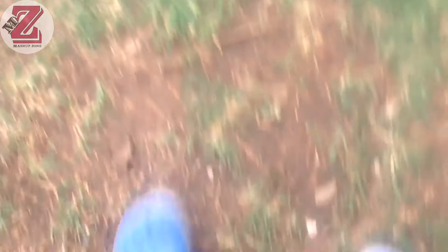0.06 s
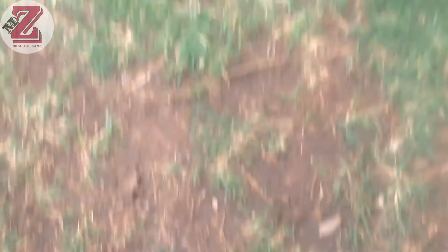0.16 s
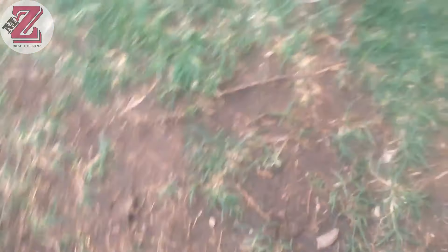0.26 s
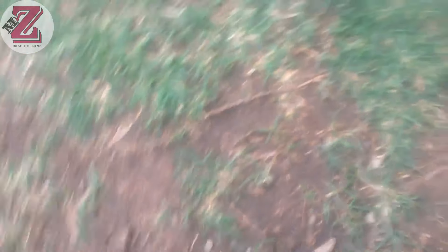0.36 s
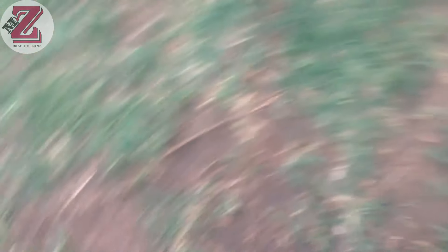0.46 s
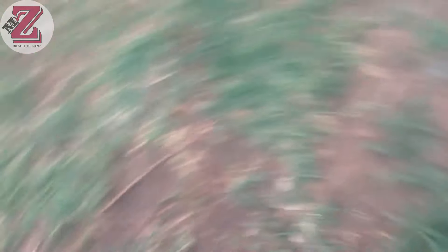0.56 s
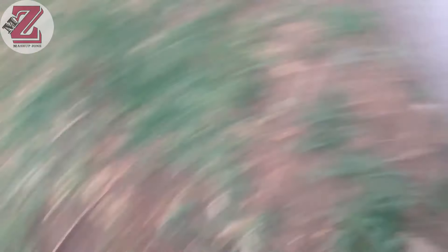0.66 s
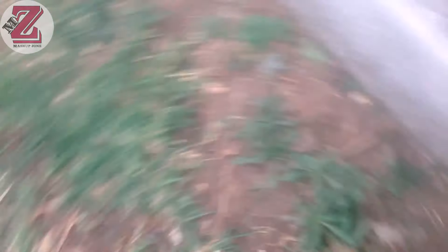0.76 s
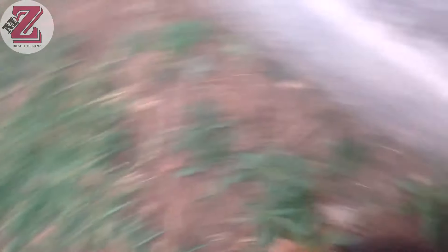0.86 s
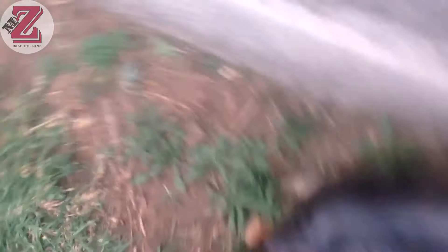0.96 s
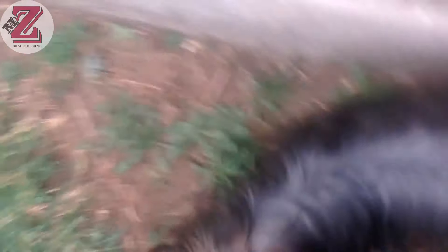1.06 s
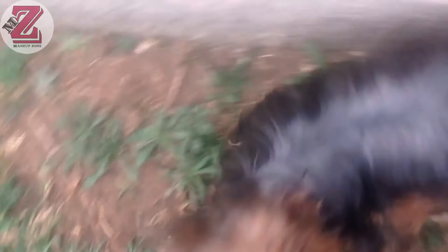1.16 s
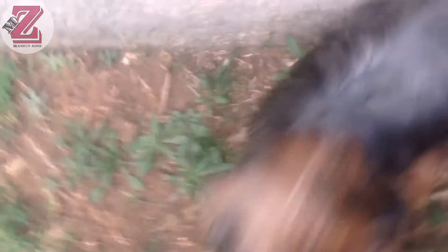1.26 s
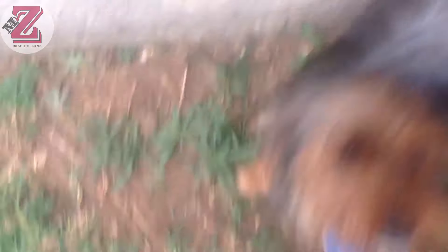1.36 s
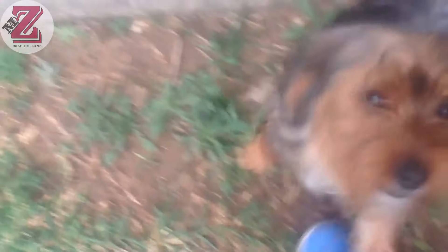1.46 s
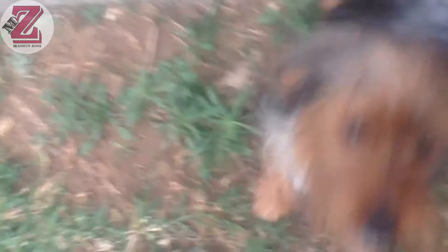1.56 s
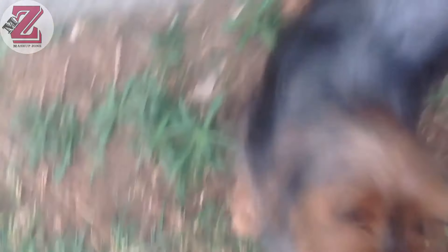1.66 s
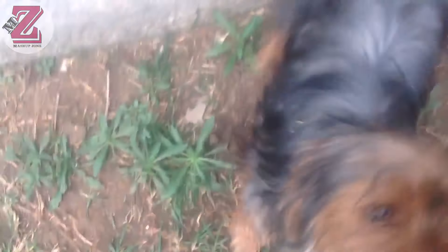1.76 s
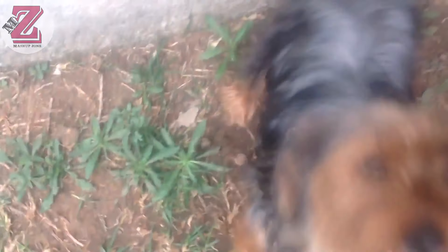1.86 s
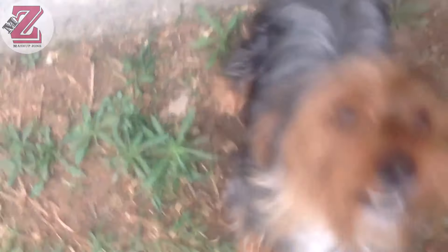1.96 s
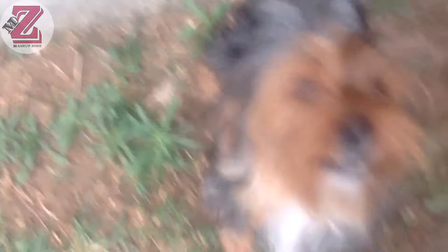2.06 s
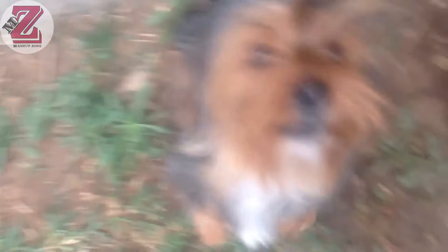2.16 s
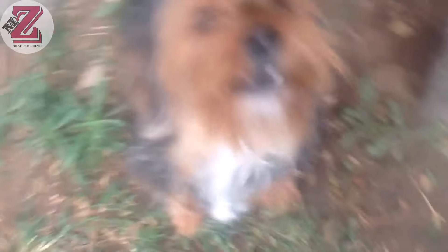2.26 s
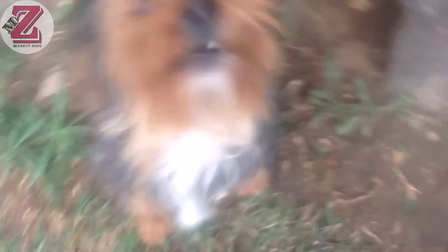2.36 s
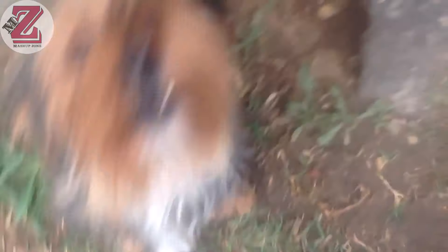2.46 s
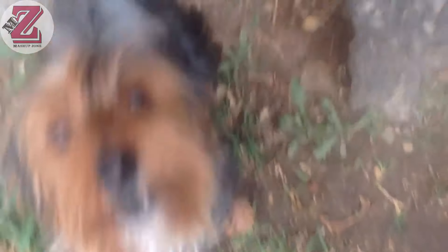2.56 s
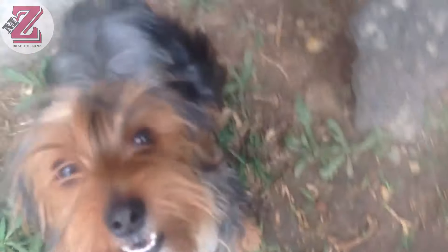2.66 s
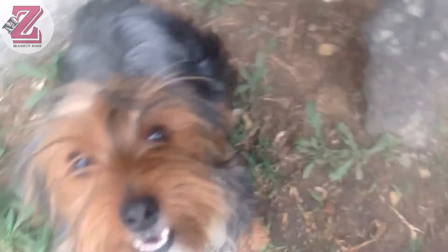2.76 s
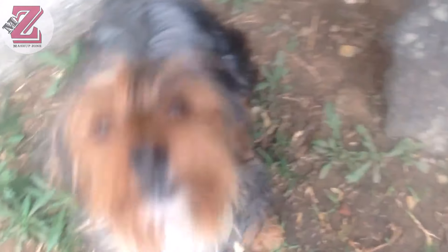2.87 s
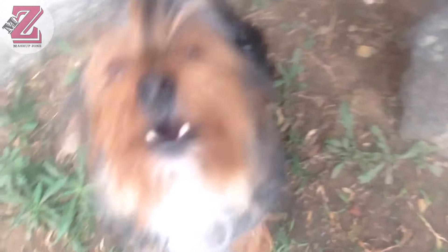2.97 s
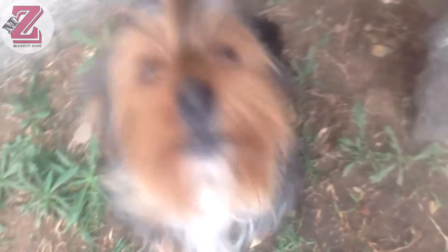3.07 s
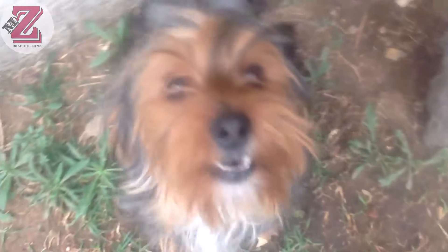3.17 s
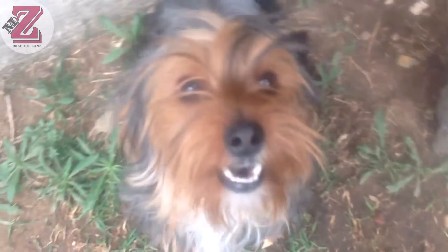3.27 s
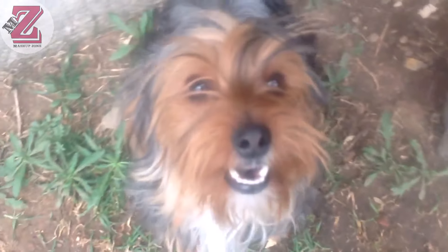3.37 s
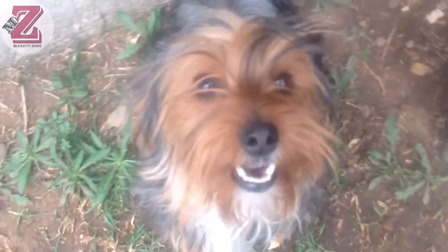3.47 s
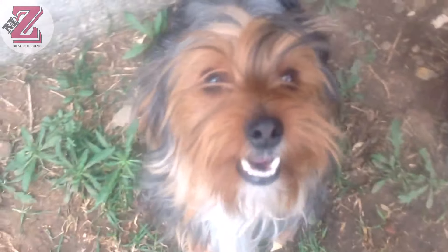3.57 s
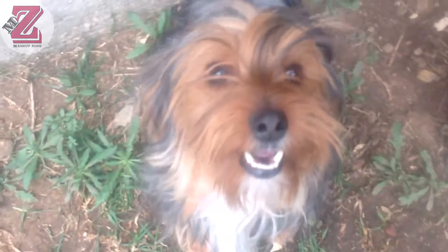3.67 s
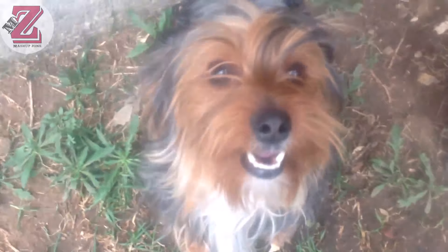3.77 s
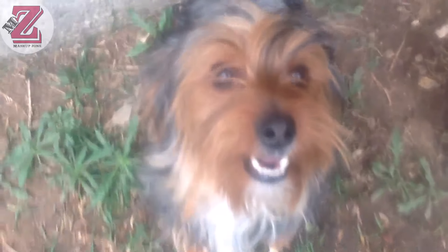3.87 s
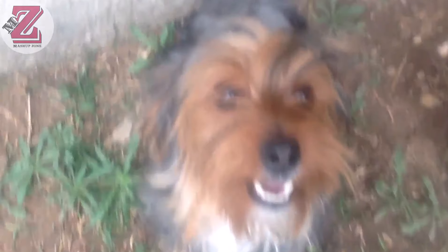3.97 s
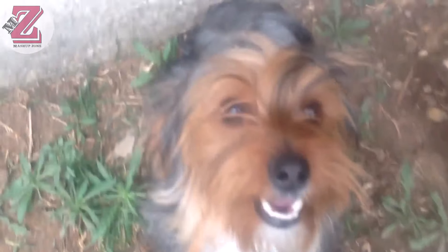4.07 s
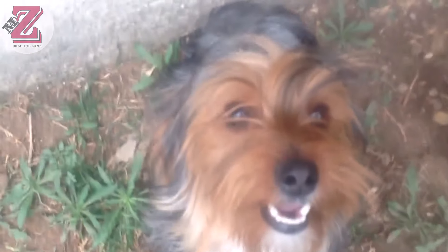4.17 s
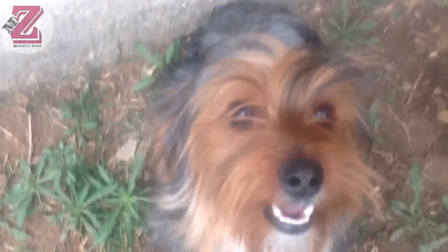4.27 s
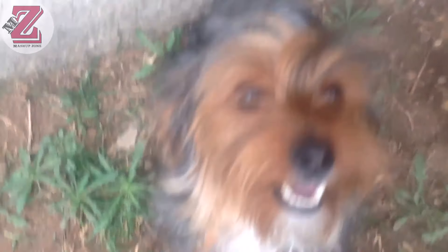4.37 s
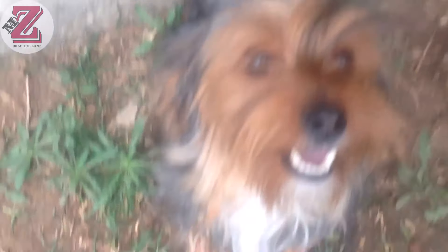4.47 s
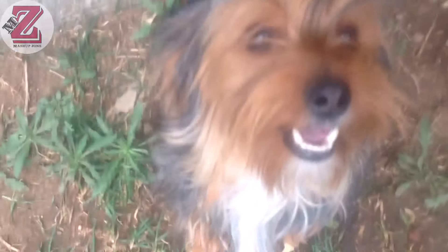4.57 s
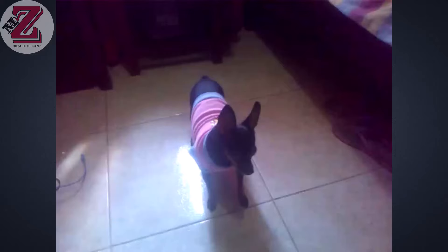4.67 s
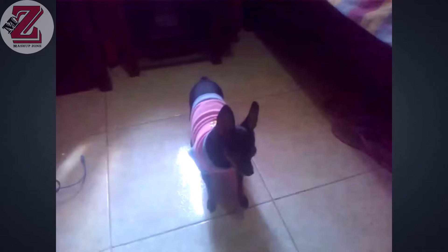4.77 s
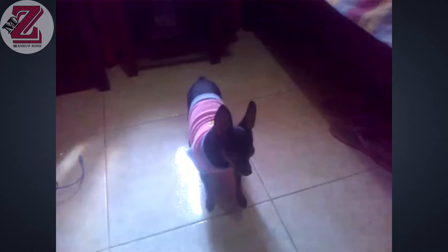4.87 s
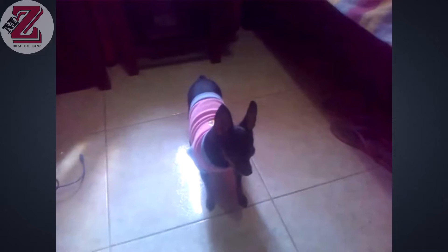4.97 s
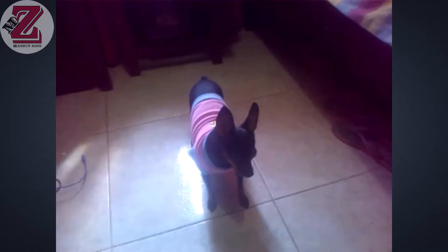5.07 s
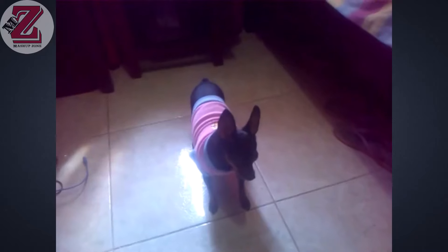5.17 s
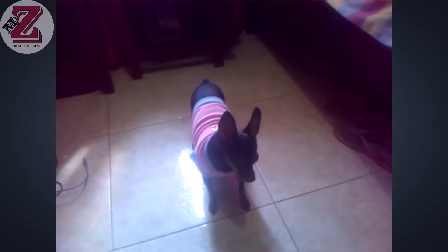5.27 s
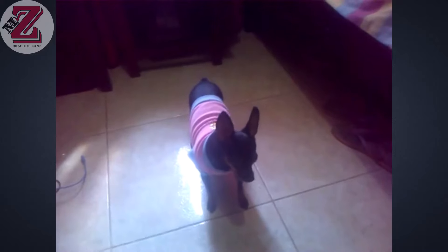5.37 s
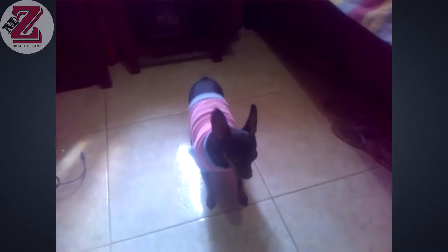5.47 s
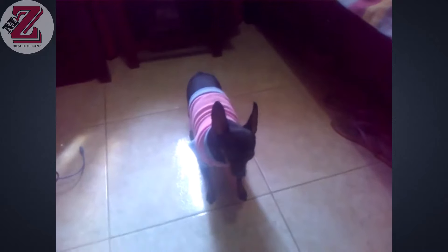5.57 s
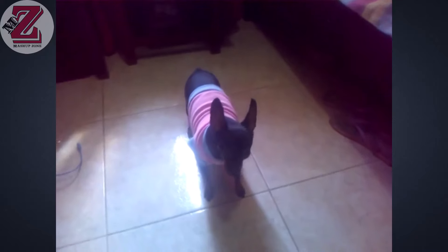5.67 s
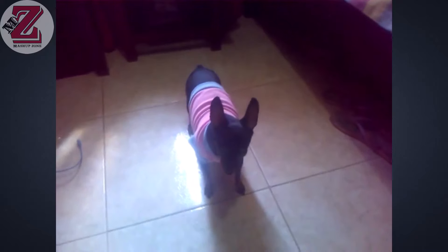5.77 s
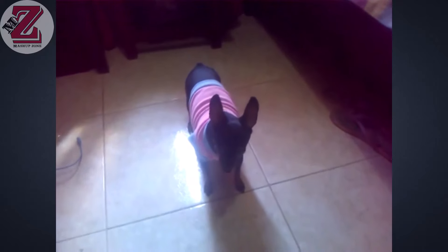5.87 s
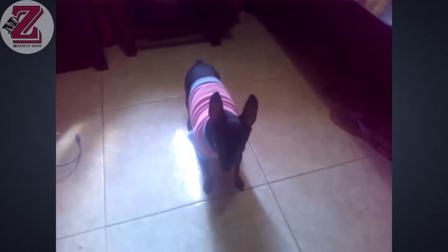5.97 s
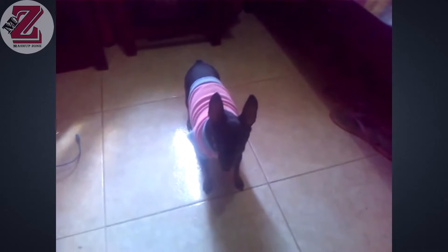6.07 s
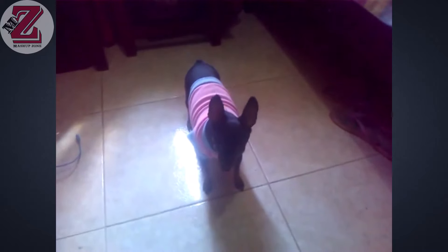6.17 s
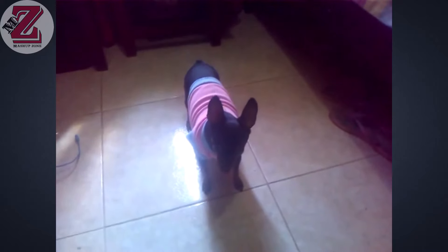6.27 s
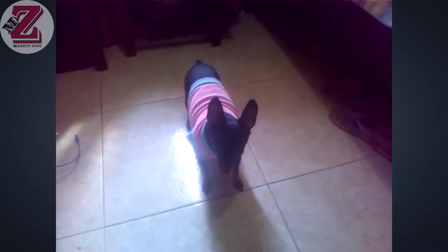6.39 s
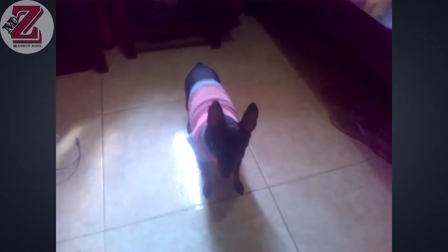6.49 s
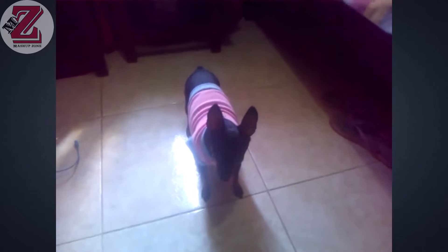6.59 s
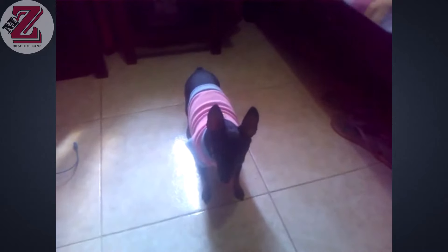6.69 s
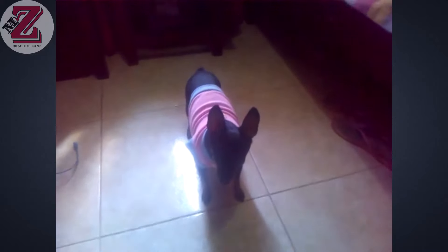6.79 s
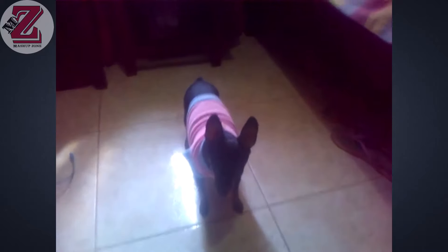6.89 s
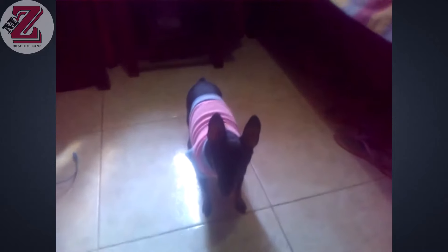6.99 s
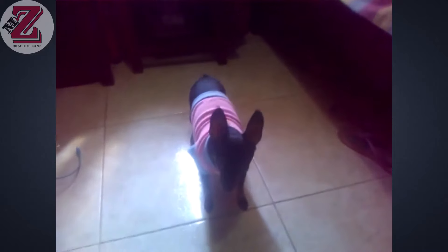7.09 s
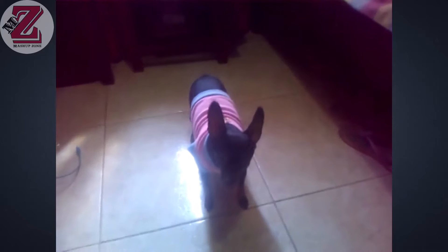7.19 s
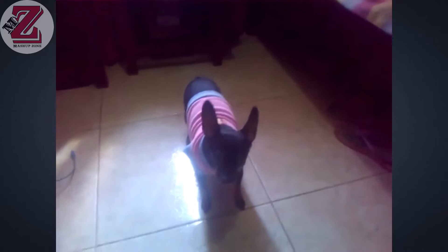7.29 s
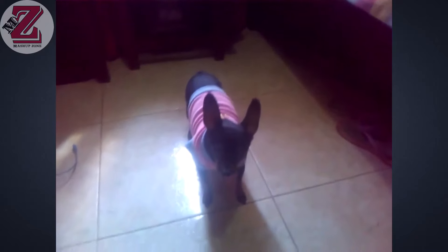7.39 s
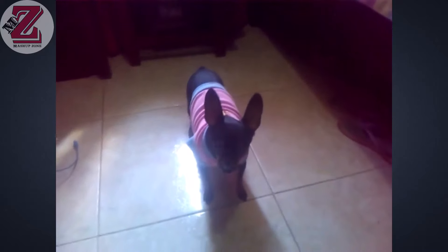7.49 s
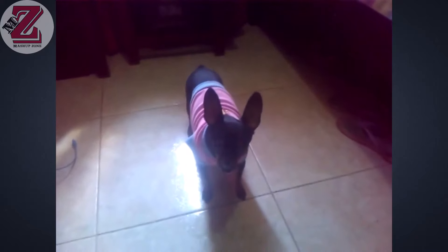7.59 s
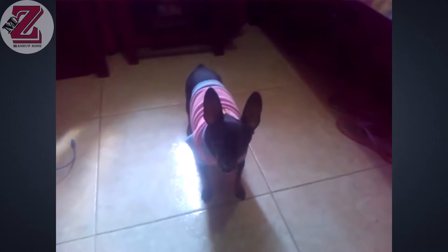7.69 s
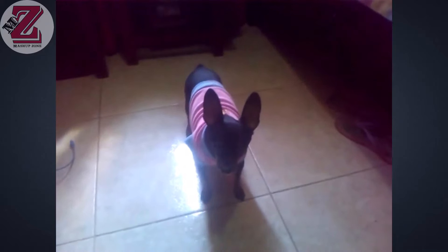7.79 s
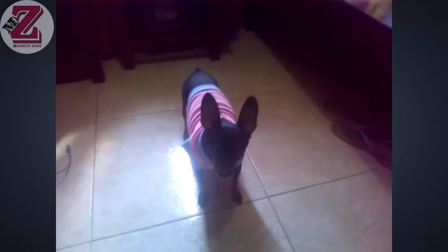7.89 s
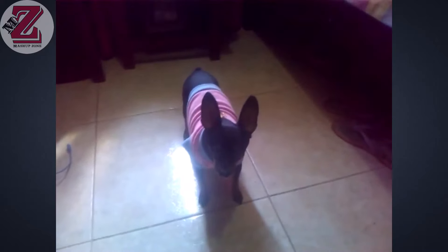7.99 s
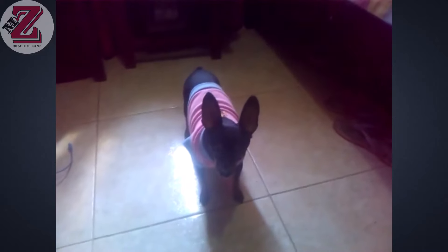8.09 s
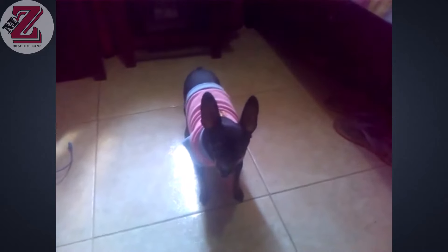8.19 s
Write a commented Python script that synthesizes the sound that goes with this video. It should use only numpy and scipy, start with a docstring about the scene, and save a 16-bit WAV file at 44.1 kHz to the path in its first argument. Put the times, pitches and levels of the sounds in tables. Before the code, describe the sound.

Close handheld microphone outdoors: shuffling steps, grass rustle, thuds and dry snaps, then two rough barks about half a second apart, each ending in a clean falling note, pushing the level to its limit. Light sniffing follows. After an abrupt cut and tiny gap, steady indoor hiss carries two very short high yaps well apart, with faint claw clicks between; the first yap distorts.

```python
"""First a yard: feet swish and scuff over dry grass, footfalls thud and stalks snap as filtered noise.
A terrier barks twice: pulses, rough then clear, ring a moving throat, echo off walls and drive the limiter.
It sniffs and huffs, two swells of noise. After a cut and a moment of silence, a hissy tiled room:
a tiny dog yaps, claws tick twice as clicks of noise, and it yaps again; loud yaps clip the microphone."""
import sys
import numpy as np
from scipy import signal
from scipy.fft import rfft, irfft, next_fast_len
from scipy.io import wavfile
from scipy.ndimage import uniform_filter1d, minimum_filter1d

SR = 44100
rng = np.random.default_rng(int(sys.argv[2]) if len(sys.argv) > 2 else 0)


def digitize_waveform(pressure):
    """Quantize a signal to 16-bit integers and store it at the path in sys.argv[1].

    Rows of a 2-D input are taken as channels; values are limited to [-1, 1].
    """
    field = np.atleast_2d(pressure).T
    bounded = np.clip(field, -1, 1)
    quanta = np.round(bounded * 32767).astype(np.int16)
    wavfile.write(sys.argv[1], SR, quanta)


N = 363384
TIME = np.arange(N) / SR
YARD_ENDS_S, ROOM_STARTS_S = 4.692, 4.755
EDGE_HZ, ROOM_EDGE_HZ = 16000, 5500  # band limits: the final sound, and the room


def gain_of(db):
    """Decibels to amplitude."""
    return 10 ** (np.asarray(db) / 20)


def evened(x):
    """Scales to rms 1."""
    return x / np.sqrt(np.mean(x ** 2) + 1e-20)


def read(points, hz):
    """Reads a table on a log-frequency axis."""
    f, value = np.transpose(points)
    return np.interp(np.log(hz + 1), np.log(f + 1), value)


def add(mix, s, sound):
    """Mixes a sound in at time s."""
    part = mix[round(s * SR):][:len(sound)]
    part += sound[:len(part)]


def blend(a, b, share):
    """From a to b as the share goes from 0 to 1."""
    return a + (b - a) * share


def ramp(t, start, length):
    """Goes from 0 to 1 over the given length."""
    return np.clip((t - start) / length, 0, 1)


def coloured(x, spectrum):
    """Filters x by a table of (frequency [Hz], level [dB]) and scales it to rms 1."""
    size = next_fast_len(len(x))
    gains = gain_of(read(spectrum, np.fft.rfftfreq(size, 1 / SR)))
    return evened(irfft(rfft(x, size) * gains, size)[:len(x)])


def band(x, lo_hz, hi_hz):
    """A gentle band-pass."""
    return signal.sosfilt(signal.butter(2, [lo_hz, min(hi_hz, SR / 2 - 1)], "band", fs=SR, output="sos"), x)


def low_pass(x, hz):
    """A steep band limit."""
    return signal.oaconvolve(x, signal.firwin(511, hz, window=("kaiser", 9), fs=SR), "same")


def wander(size, hz):
    """Smooth random drift scaled to rms 1, its rates fading out around hz."""
    length = max(size, SR)
    f = np.fft.rfftfreq(length, 1 / SR)
    drift = irfft(rfft(rng.standard_normal(length)) * np.exp(-(f / hz) ** 2))
    return evened(drift)[:size]


def tick(db, hz, fade_s):
    """A brief dry click: noise around hz that falls by 1/e in each fade_s."""
    t = TIME[:SR // 10]
    return gain_of(db) * evened(band(rng.standard_normal(len(t)), hz * 0.4, hz * 1.28)) * np.exp(-t / fade_s)


def swells(rows, rise_s, fall_s):
    """Attack, hold and release for rows of (s, length, dB, dB): one gain curve for each level column."""
    return sum(gain_of(levels)[:, None] * ramp(TIME, s, rise_s) * (1 - ramp(TIME, s + length - fall_s, fall_s))
               for s, length, *levels in rows)


def space(x, t60, colour, echoes, wet_db):
    """Direct sound, a few wall echoes, and a scattered tail whose bands die at their own speeds."""
    taps = rng.choice([-1., 1.], SR) * (rng.random(SR) < 1 / 10) * (TIME[:SR] > .008)
    hz, t, z = signal.stft(taps, SR, nperseg=512)
    decay_db = 60 * t / read(t60, hz)[:, None]
    z = z * gain_of(read(colour, hz)[:, None] - decay_db)
    response = signal.istft(z, SR, nperseg=512)[1]
    response *= gain_of(wet_db) / np.linalg.norm(response)
    for delay, db in echoes:
        add(response, delay, gain_of([db]))
    return x + signal.fftconvolve(x, response)[:N]


# how long the yard rings: (frequency [Hz], decay by 60 dB [s])
YARD_DECAY = [(200, 0.55), (750, 0.61), (1250, 0.72), (1700, 0.98), (2600, 1), (6000, 0.32), (14000, 0.29)]
# tint of the yard's tail: (frequency [Hz], relative level [dB])
YARD_TINT = [(200, 0.5), (440, 4), (540, -8), (660, 0.5), (800, -1), (1000, 2.5), (1190, -1.5),
             (1420, -5.5), (1700, -4), (2000, -4.5), (2600, -5.5), (3400, -9.5), (5500, 1), (7200, -4.5),
             (10000, -2.5)]
# echoes off the yard walls: (delay [s], level [dB])
YARD_WALLS = [(.0044, -18.5), (0.037, -19.5), (0.06, -26), (.088, -24.5)]


def in_yard(x):
    """Open space with walls: sparse echoes and a tail that lingers in the middle bands."""
    return space(x, YARD_DECAY, YARD_TINT, YARD_WALLS, wet_db=-18.0)


# how long the tiled room rings: (frequency [Hz], decay by 60 dB [s])
ROOM_DECAY = [(200, 0.16), (1000, 0.23), (2000, 0.18), (3200, 0.24), (5400, 0.36)]
# tint of the room's tail: (frequency [Hz], relative level [dB])
ROOM_TINT = [(200, -16.5), (600, -7), (950, -1), (1180, -8.5), (1500, 3), (2100, -0.5), (3200, 5.5),
             (4400, -28), (5400, -7)]
# echoes off the room walls: (delay [s], level [dB])
ROOM_WALLS = [(.007, -9), (0.018, -20.5), (0.026, -54), (.044, -32)]


def in_room(x):
    """A tiled room: a strong early slap and a short tail."""
    return space(x, ROOM_DECAY, ROOM_TINT, ROOM_WALLS, wet_db=-14.5)


# tone of the yard's air: (frequency [Hz], relative density [dB per Hz])
YARD_AIR_TONE = [(30, -57), (70, -34), (110, -7.5), (170, -7), (300, -10.5), (560, -14.5), (1500, -18),
                 (3500, -21), (6000, -30.5), (15000, -30)]


def yard_air():
    """Quiet steady noise, strongest in the low bands."""
    return gain_of(-57) * coloured(rng.standard_normal(N), YARD_AIR_TONE)


# tone of the room's hiss: (frequency [Hz], relative density [dB per Hz])
ROOM_HISS_TONE = [(20, -2), (90, -5.5), (160, -0.5), (240, 9), (420, 3), (1050, 6), (1700, 4), (3000, 1.5),
                  (3900, -3), (4600, -8.5), (5400, -16)]


def room_hiss():
    """A clearly audible bed of steady noise that falls off in the treble."""
    return gain_of(-41) * coloured(rng.standard_normal(N), ROOM_HISS_TONE)


# tone of the grass and of the soil: (frequency [Hz], relative density [dB per Hz])
SWISH_TONE = [(500, -33.5), (1200, -10), (2500, 0), (4000, -6.5), (7000, -15), (14000, -24.5),
              (15500, -37.5)]
SCUFF_TONE = [(50, -37.5), (110, -16), (190, -6.5), (450, -8), (1100, -3), (2000, -7), (4000, -23.5)]
# feet and paws brushing the grass: (time [s], length [s], swish level [dB], dull scuff level [dB])
STRIDE_ROWS = [(0.04, 0.21, -42, -42), (0.51, 0.14, -42, -44), (0.6, 0.2, -42.5, -45.5),
               (0.79, 0.17, -44, -45), (0.976, 0.054, -33, -35), (1.04, 0.068, -35.5, -38),
               (1.42, 0.44, -40.5, -47), (1.94, 0.11, -44.5, -43), (2.09, 0.23, -43.5, -46.5),
               (3.76, 0.15, -55.5, -50)]
# light rustle between strides, mostly dying away once the terrier stands still: (time [s], level [dB])
RUSTLE_LEVEL = [(0, -49), (0.42, -49), (1.2, -49), (1.9, -45), (2.65, -55), (2.9, -46), (3.3, -63),
                (4.1, -86), (4.68, -71.5)]
CRACKLES_PER_S, CRACKLE_SPREAD_DB = 4000, 1.7


def grass():
    """Shuffling feet: a swish of tiny crackles over a dull scuff of soil."""
    swish_gain, scuff_gain = swells(STRIDE_ROWS, rise_s=0.021, fall_s=0.091)
    rustle = gain_of(np.interp(TIME, *np.transpose(RUSTLE_LEVEL)))
    hits = rng.random(N) < CRACKLES_PER_S / SR
    sizes = gain_of(CRACKLE_SPREAD_DB * np.minimum(rng.exponential(1, N), 5))
    crackles = rng.standard_normal(N) * hits * sizes
    swish_flutter, scuff_flutter = gain_of(1.6 * wander(N, 27)), gain_of(2.2 * wander(N, 35))
    swish = coloured(crackles, SWISH_TONE) * np.hypot(swish_gain, rustle) * swish_flutter
    scuff = coloured(rng.standard_normal(N), SCUFF_TONE) * np.hypot(scuff_gain, rustle * gain_of(-2))
    return swish + scuff * scuff_flutter


# footfalls and soft bumps, levels before the envelope:
# (time [s], thud level [dB], pat level [dB], crunch level [dB])
FOOTFALLS = [(0.497, -34, -29.5, -41), (0.727, -17, -18, -37), (0.873, -32, -53, -48),
             (0.978, -25.5, -26.5, -26), (1.002, -30.5, -51, -50), (1.07, -30, -28, -36),
             (1.145, -39, -27, -22.5), (2.066, -32, -28.5, -29), (3.758, -60, -35.5, -43),
             (4.181, -43, -58, -71)]
STEP_RISE_S, STEP_T60_S = .0022, 0.05


def footfalls():
    """Each footfall is a thud, a pat of soil and a crunch: three noise bands under one fast decay."""
    out, t = np.zeros(N), TIME[:SR // 5]
    envelope = (1 - np.exp(-t / STEP_RISE_S)) * np.exp(-np.log(1000) * t / STEP_T60_S)
    for s, thud_db, pat_db, crunch_db in FOOTFALLS:
        parts = [(thud_db, 165, 560), (pat_db, 400, 1300), (crunch_db, 1300, 4500)]
        blow = sum(gain_of(db) * evened(band(rng.standard_normal(len(t)), lo, hi)) for db, lo, hi in parts)
        add(out, s, blow * envelope)
    return out


# dry stalks snapping: (time [s], level before the fade [dB], tone [Hz])
STALK_SNAPS = [(0.057, -19, 1080), (0.158, -19.5, 6500), (0.267, -21, 2710), (0.661, -30, 2640),
               (1.358, -26.5, 2180), (1.401, -26.5, 2700), (3.722, -33.5, 3530), (3.872, -27.5, 1580),
               (3.901, -49, 4500), (4.133, -48, 2965)]


def stalks():
    """Dry stalks snap: clicks of noise that die within a few milliseconds."""
    out = np.zeros(N)
    for s, db, hz in STALK_SNAPS:
        add(out, s, tick(db, hz, fade_s=0.00095))
    return out


# claws ticking: (time [s], level before the fade [dB], tone [Hz])
CLAW_TICKS = [(5.759, -35, 2700), (6.96, -42, 4200)]


def claws():
    """Claws tick: clicks of noise a little longer than a snapping stalk."""
    out = np.zeros(N)
    for s, db, hz in CLAW_TICKS:
        add(out, s, tick(db, hz, fade_s=0.006))
    return out


# tone of the air in the nose: (frequency [Hz], relative density [dB per Hz])
NOSE_TONE = [(500, 0.5), (1500, 7.5), (3200, 8.5), (4500, -6), (5800, 0.5), (9000, -12), (12000, -31)]
# the sniff and the huff: (time [s], length [s], nose hiss level [dB], mouth puff level [dB])
BREATHS = [(3.52, 0.14, -42, -65), (4.325, 0.16, -58, -49.5)]


def terrier_breath():
    """A sniff, then a huff: bright noise from the nose and duller noise from the mouth swell and fade."""
    nose, mouth = swells(BREATHS, rise_s=0.023, fall_s=0.11)
    hiss = coloured(rng.standard_normal(N), NOSE_TONE)
    puff = evened(band(rng.standard_normal(N), 252, 2300))
    return nose * hiss + mouth * puff


def resonate(x, hz, width):
    """A steep resonance of gain 1 that follows the curve hz."""
    turn, r = np.exp(2j * np.pi * np.cumsum(hz) / SR), np.exp(-np.pi * width / SR)
    return 2 * (turn * signal.lfilter([(1 - r) ** 2], [1, -2 * r, r * r], x / turn)).real


UPPER_FROM_HZ, TREBLE_FROM_HZ, HISSY_FROM_HZ = 800, 2250, 4000
SHIMMER_HZ = 170  # a rough voice comes in uneven bursts
QUIVER, QUIVER_HZ = .06, 70  # share by which the resonances move while the voice is rough, and its rate


def bark(effort_db, hz, rough, mouth, treble_db, throat, jitter, jitter_hz, uneven, breath, tilt_db,
         shimmer_db, hiss, shut_db, rattle, rattle_hz):
    """Vocal pulses, shaken and mixed with air when rough, pass a throat that opens and shuts."""
    size, rough = len(hz), np.clip(rough, 0, 1)
    turns = np.cumsum(hz * (1 + jitter * rough * wander(size, jitter_hz))) / SR
    # tilt_db is the slope per octave
    folds = evened(sum(gain_of(tilt_db * np.log2(k)) * np.sin(2 * np.pi * k * turns) for k in range(1, 22)))
    folds *= 1 + uneven * rough * np.cos(np.pi * turns)  # strong and weak pulses alternate: half lines
    beats = np.cumsum(rattle_hz * (1 + jitter * wander(size, jitter_hz))) / SR
    folds *= 1 + rattle * rough * np.cos(2 * np.pi * beats)  # loose tissue: side lines around each harmonic
    air = evened((1 + np.cos(2 * np.pi * turns)) * rng.standard_normal(SR)[:size])
    shimmer = gain_of(shimmer_db * rough * wander(size, SHIMMER_HZ))
    drive = ((1 - rough) * folds + breath * rough * air) * shimmer
    # air at the teeth helps to ring the highest resonances
    hissy = blend(drive, air, np.clip(hiss * rough, 0, 1))
    upper_db = shut_db * np.maximum(1 - mouth, 0)  # a half-shut mouth lets out mainly the lowest ones
    voice = 0
    for f, width, db, follows in throat:
        level_db = db + upper_db * ramp(f, UPPER_FROM_HZ, UPPER_FROM_HZ) + treble_db * (f > TREBLE_FROM_HZ)
        tuned = f * mouth ** follows * (1 + QUIVER * rough * wander(size, QUIVER_HZ))
        source = hissy if f > HISSY_FROM_HZ else drive
        voice = voice + gain_of(level_db) * resonate(source, tuned, width)
    voice /= np.sqrt(uniform_filter1d(voice ** 2, size=600) + 1e-12)  # effort alone sets the loudness
    return gain_of(effort_db) * voice * signal.windows.tukey(size, .02)


# a soft grunt leads in; pitch and mouth climb as the effort swells and the voice clears; then it breaks up
GRUNT_S, GRUNT_DB, GRUNT_ROUGH, GRUNT_MUFFLE_DB = .018, -24, 0.4, -14
YAP_ATTACK_S, YAP_START_DB = 0.0046, -7.5
CLIMB_S, PITCH_CLIMB, MOUTH_CLIMB = 0.0478, .225, 0.23  # climbs as shares of the top pitch and widest mouth
BREAK_S, YAP_RELEASE_S, YAP_RELEASE_DB = 0.025, 0.041, -12
ROUGH_LEAD_S = 0.0084  # the roughness sets in a little before the pitch gives way


def yap_gesture(length, peak_db, broken_db, top_hz, break_s, sag, start_rough, top_rough, broken_rough,
                widest, end_mouth):
    """Effort, pitch, roughness, mouth and treble of a yap: grunt, swelling climb, rough sagging end."""
    t = np.arange(-GRUNT_S, length, 1 / SR)
    opened = ramp(t, -YAP_ATTACK_S / 2, YAP_ATTACK_S)
    broken = ramp(t, break_s - BREAK_S / 2, BREAK_S)
    below_top = np.minimum(t / CLIMB_S - 1, 0) ** 2
    swell_db = blend(YAP_START_DB, peak_db, ramp(t, 0, break_s))
    voice_db = blend(swell_db, broken_db, ramp(t, break_s, BREAK_S / 2))
    voice_db += YAP_RELEASE_DB * ramp(t, length - YAP_RELEASE_S, YAP_RELEASE_S) ** 2
    hz = top_hz * (1 - PITCH_CLIMB * below_top) * (1 - sag * broken)
    roughening = ramp(t + ROUGH_LEAD_S, break_s - BREAK_S / 2, BREAK_S)
    rough = blend(blend(top_rough, start_rough, below_top), broken_rough, roughening)
    mouth = blend(widest * (1 - MOUTH_CLIMB * below_top), end_mouth, broken)
    return (blend(GRUNT_DB, voice_db, opened), hz, blend(GRUNT_ROUGH, rough, opened), mouth,
            GRUNT_MUFFLE_DB * (1 - opened))


# the tiny dog's throat, shaped a little differently for each yap, one list a yap:
# (resonance [Hz], width [Hz], level [dB], how far it follows the jaw [0-1])
YAP_THROATS = [
    [(1109, 316, 11.5, 0.9), (1908, 266, 4, 0.08), (2940, 630, -1.5, 0.74), (4630, 500, -18, 0)],
    [(895.5, 235, 11.5, 0.62), (1588, 620, 6.5, 1), (2515, 210, 2, 0.06), (2843, 124, 2.5, 0.02),
     (3620, 800, -12, 0.56), (5000, 1700, -15.5, 0)],
]
# yaps, timed from the mouth opening: (time [s], length [s], peak effort [dB], effort after the break [dB],
# top pitch [Hz], voice breaks after [s], pitch lost in the break [0-1], roughness at the start [0-1],
# at the top [0-1] and after the break [0-1], widest mouth [factor], mouth at the end [factor])
YAP_ROWS = [(5.546, 0.12, 12, 0.5, 594, .07, .08, 0.506, 0.066, 0.48, 1.082, 0.933),
            (7.22, 0.1, 4.2, -6, 509.8, 0.0676, 0.0417, 0.12, 0.02, 0.5, 1.211, 0.923)]


def tiny_dog():
    """Shrill yaps: pitch and throat climb together, then the voice breaks up and sags."""
    out = np.zeros(N)
    for (s, *shape), throat in zip(YAP_ROWS, YAP_THROATS):
        yap = bark(*yap_gesture(*shape), throat, jitter=0.1323, jitter_hz=302, uneven=0.92, breath=0.9,
                   tilt_db=0.4, shimmer_db=7.0, hiss=0.2, shut_db=-5, rattle=0.65, rattle_hz=145.5)
        add(out, s - GRUNT_S, yap)
    return out


# tone of the rasp at the terrier's teeth: (frequency [Hz], relative density [dB per Hz])
RASP_TONE = [(2000, -28), (3800, -3), (5000, 3.5), (6500, -3), (8500, -13.5), (13000, -9.5), (15500, -22)]
RASP_DB = -29.5  # relative to the effort, at full roughness
RASP_BURST_DB, RASP_BURST_HZ = 6.5, 130  # depth and rate of its bursts


def rasp(effort_db, rough):
    """Air torn at the teeth: a wide, ragged hiss that comes in bursts while the voice is hoarse."""
    bursts_db = RASP_BURST_DB * wander(len(rough), RASP_BURST_HZ)
    hiss = coloured(rng.standard_normal(SR), RASP_TONE)[:len(rough)]
    return hiss * rough ** 2 * gain_of(effort_db + RASP_DB + bursts_db)


# a bark starts as a low grumble behind a nearly shut mouth; its pitch is the one reached at the opening
GRUMBLE_S, GRUMBLE_HZ, GRUMBLE_HZ_PER_S, GRUMBLE_DB_PER_S, GRUMBLE_ROUGH = .042, 395.2, 2200, 474, 0.567
# it bursts out hoarse, climbs in pitch, cracks, and ends as a clean falling note
BARK_ATTACK_S, CRACK_S, BARK_RELEASE_S, BARK_RELEASE_DB = 0.0077, 0.011, 0.015, -20.5
BARK_START_HZ, BARK_TOP_HZ, FALL_POWER = 557.8, 811, 1.8
OPENING_ROUGH, HOARSE, CLEAN = .6, 0.82, 0.03  # hoarsest from the moment the jaw is widest until it clears
NOTE_DB, NOTE_BRIGHT_DB = -5.5, 4.5  # the clean note is softer but brighter
CLEAR_CHANGE_S = 0.008  # spread of the brief level change as the voice clears
# the treble is muffled while the lips part and again as they close
BARK_MUFFLE_DB, LIPS_PART_S, LIPS_CLOSE_S = -2, 0.04, 0.019
SHUT_MOUTH, AJAR_MOUTH, END_MOUTH = 0.5, 0.75, 0.89  # factors on the throat


def bark_gesture(length, loud_db, grumble_db, crest_s, cracked_hz, end_hz, clear_s, clearing_s,
                 clear_change_db, widest, jaw_s):
    """Effort, pitch, roughness, mouth and treble of a bark: grumble, hoarse climb, crack, falling note."""
    t = np.arange(-GRUMBLE_S, length, 1 / SR)
    opened, cracked = ramp(t, -BARK_ATTACK_S / 2, BARK_ATTACK_S), ramp(t, crest_s, CRACK_S)
    clear = ramp(t, clear_s - clearing_s, clearing_s)
    voice_db = loud_db + NOTE_DB * clear
    voice_db += clear_change_db * np.exp(-((t - clear_s) / CLEAR_CHANGE_S) ** 2)
    voice_db += BARK_RELEASE_DB * ramp(t, length - BARK_RELEASE_S, BARK_RELEASE_S) ** 2
    climb = blend(BARK_START_HZ, BARK_TOP_HZ, ramp(t, 0, crest_s))
    fall = blend(cracked_hz, end_hz, ramp(t, crest_s, length - crest_s) ** FALL_POWER)
    hoarse = blend(OPENING_ROUGH, HOARSE, ramp(t, 0, jaw_s))
    mouth = np.interp(t, [-GRUMBLE_S, 0, jaw_s, length], [SHUT_MOUTH, AJAR_MOUTH, widest, END_MOUTH])
    lips = 1 - ramp(t, 0, LIPS_PART_S) + ramp(t, length - LIPS_CLOSE_S, LIPS_CLOSE_S)
    return (blend(grumble_db + GRUMBLE_DB_PER_S * t, voice_db, opened),
            blend(GRUMBLE_HZ + GRUMBLE_HZ_PER_S * t, blend(climb, fall, cracked), opened),
            blend(GRUMBLE_ROUGH, blend(hoarse, CLEAN, clear), opened),
            mouth,
            NOTE_BRIGHT_DB * clear ** 2 + BARK_MUFFLE_DB * lips)


# the terrier's open throat: (resonance [Hz], width [Hz], level [dB], how far it follows the jaw [0-1])
BARK_THROAT = [(392, 45, -5, 1), (716, 276, 8.5, 1), (1188, 220, 11, 0.2), (1617, 168, 6, 0.25),
               (2632, 130, -14, 0.02), (3340, 200, -15.5, 0.1), (5330, 350, -24, 0), (7120, 510, -27, 0.3),
               (10100, 2400, -36, 0)]
# barks, timed from the mouth opening: (time [s], length [s], effort [dB], grumble at the opening [dB],
# pitch crest after [s], pitch after the crest [Hz], pitch at the end [Hz], voice clear after [s],
# clearing takes [s], brief level change as the voice clears [dB] (a dip in the first bark, a small swell
# in the second), widest mouth [factor on the throat], widest after [s])
BARK_ROWS = [(2.393, .166, -1, -8, .072, 604.5, 563.6, .133, .012, -8.5, 1.07, 0.06),
             (2.974, .192, -0.5, -14, .128, 681, 510.3, .133, 0.0434, 2.5, 1.2, .09)]


def terrier():
    """Hoarse barks with a rasp at the teeth that end in a clean falling note."""
    out = np.zeros(N)
    for s, *shape in BARK_ROWS:
        effort_db, hz, rough, mouth, treble_db = bark_gesture(*shape)
        voice = bark(effort_db, hz, rough, mouth, treble_db, BARK_THROAT, jitter=.14, jitter_hz=165.0,
                     uneven=0.97, breath=0.5, tilt_db=-0.38, shimmer_db=3.0, hiss=0.91, shut_db=-36.0,
                     rattle=1.5, rattle_hz=175.74)
        add(out, s - GRUMBLE_S, rasp(effort_db, rough) + voice)
    return out


def scene():
    """The yard with its bass cut away, a moment of silence at the cut, then the duller room."""
    yard = yard_air() + grass() + footfalls() + stalks() + terrier_breath() + in_yard(terrier())
    yard = signal.sosfilt(signal.butter(3, 125, "high", fs=SR, output="sos"), yard)
    room = low_pass(room_hiss() + in_room(claws() + tiny_dog()), ROOM_EDGE_HZ)
    heard = np.array([TIME < YARD_ENDS_S, TIME > ROOM_STARTS_S], float)
    yard_fade, room_fade = uniform_filter1d(heard, size=300)
    return (yard * yard_fade + room * room_fade)[None]


def flatten(x):
    """Flattens the peaks at full scale."""
    return x / (1 + x ** 20) ** (1 / 20)


def limiter(x, recovery_db_per_s):
    """The gain falls at once and recovers quickly; what still overshoots is flattened."""
    over_db = np.maximum(20 * np.log10(abs(x) + 1e-9) - 0.3, 0)  # acts from 0.3 dB above full scale
    recovery_db = TIME * recovery_db_per_s
    gain = gain_of(recovery_db - np.maximum.accumulate(over_db + recovery_db))
    return flatten(x * uniform_filter1d(minimum_filter1d(gain, size=40), size=40))


def overload(x, dull_db):
    """Flat-topped clipping; the harsh top that it adds comes out duller."""
    clipped = flatten(x)
    body = low_pass(clipped, ROOM_EDGE_HZ)
    return body + gain_of(dull_db) * (clipped - body)


def record(dry):
    """A limiter holds the yard; the room overloads the microphone; then the band limit."""
    yard = limiter(dry[0], recovery_db_per_s=1105)
    room = overload(dry[0], dull_db=-13.0)
    return low_pass(np.where(TIME < YARD_ENDS_S, yard, room), EDGE_HZ)[None]


dry = scene()
out = record(dry)
digitize_waveform(out)
```